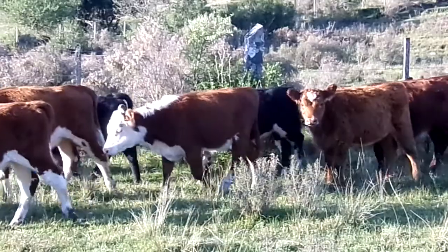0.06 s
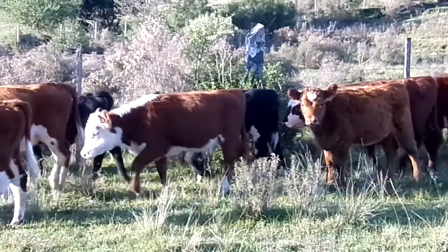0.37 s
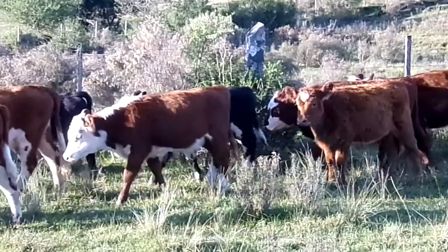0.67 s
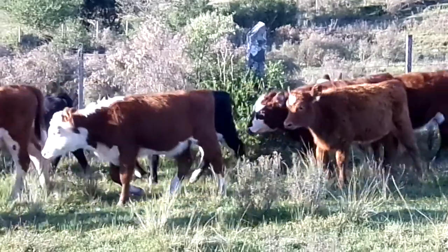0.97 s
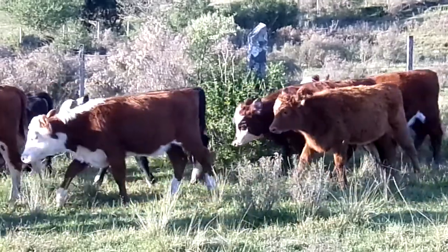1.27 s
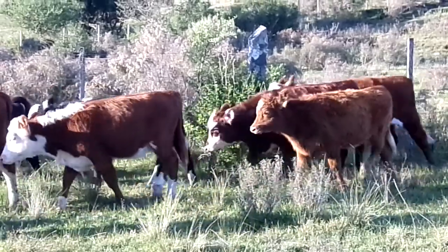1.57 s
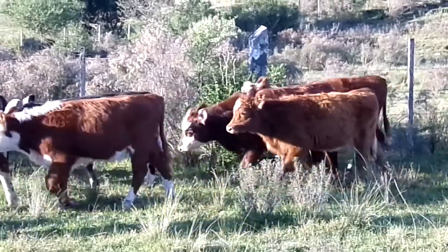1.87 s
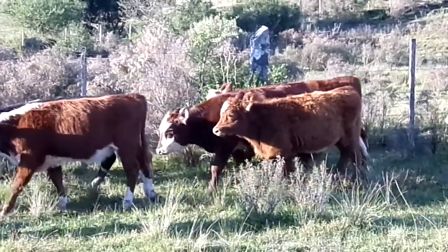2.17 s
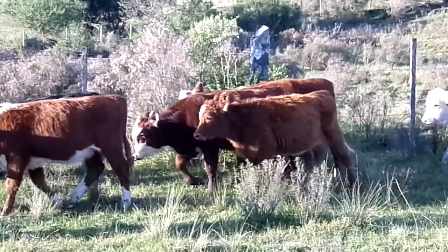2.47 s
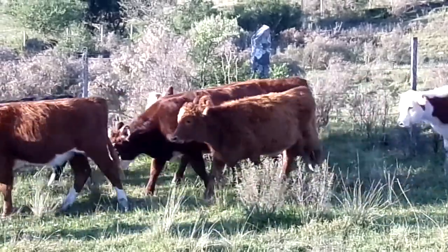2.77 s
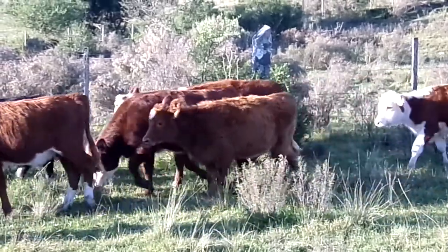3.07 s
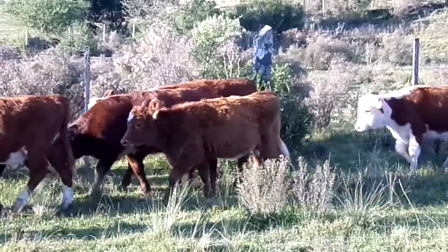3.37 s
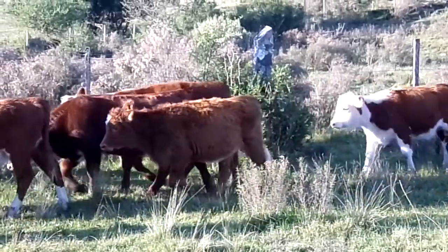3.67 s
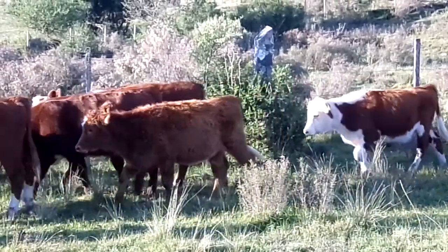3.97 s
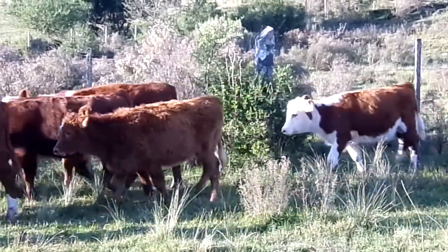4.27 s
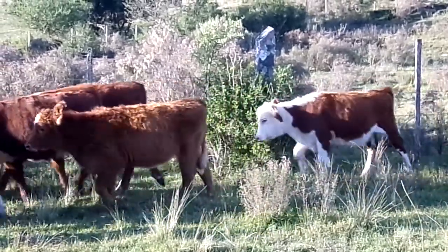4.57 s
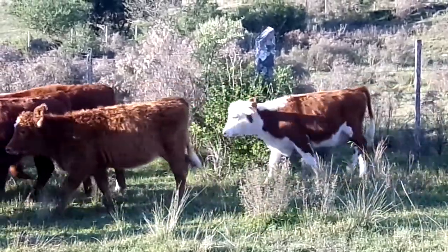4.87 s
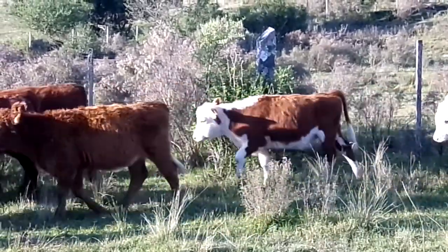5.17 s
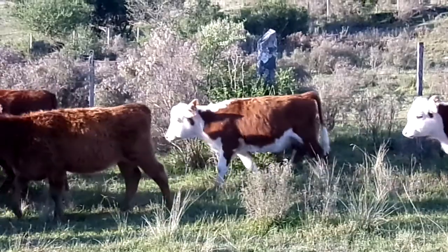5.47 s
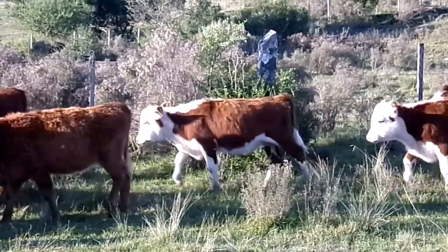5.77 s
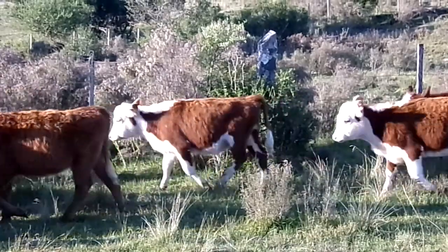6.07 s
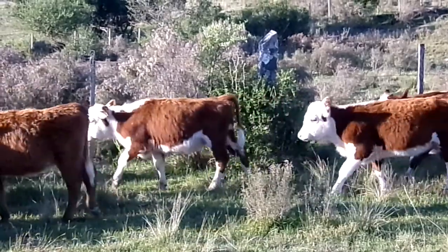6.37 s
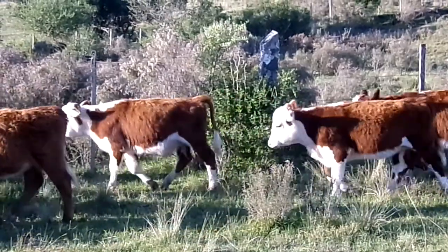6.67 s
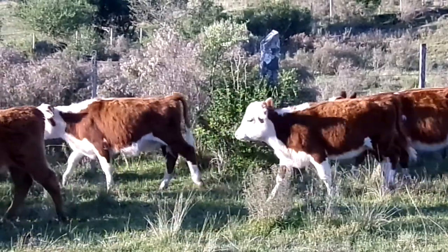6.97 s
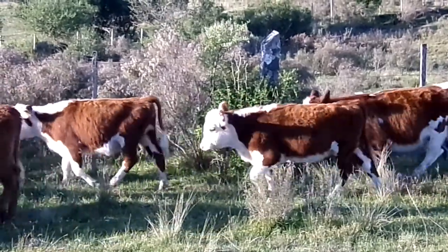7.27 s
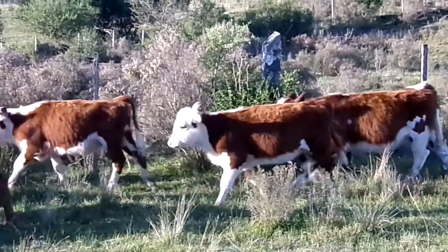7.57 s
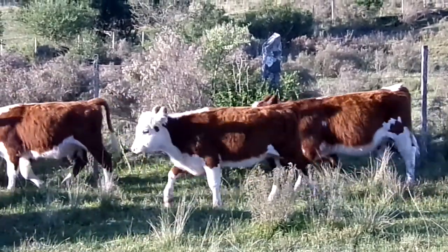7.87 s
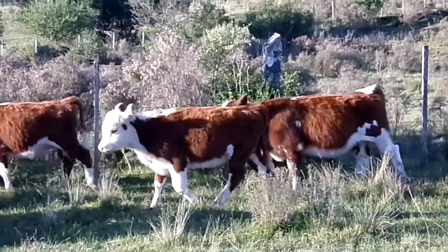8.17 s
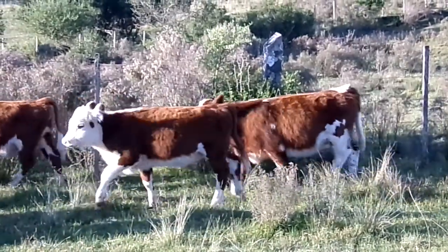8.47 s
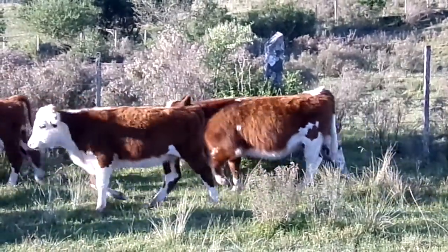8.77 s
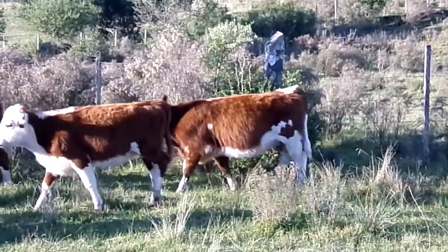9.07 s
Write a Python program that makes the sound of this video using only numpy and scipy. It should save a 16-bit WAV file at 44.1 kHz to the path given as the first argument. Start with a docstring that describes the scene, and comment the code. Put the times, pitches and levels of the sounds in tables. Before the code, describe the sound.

Young cattle moo in an open paddock. A clear, close moo fills the first second and turns rough as its pitch drops, while a distant moo runs from about 0.6 to 2 seconds. One hoarse animal repeats a short, breathy moo that scoops up and falls away, at about 0.6, 1.7, 2.9, 4.5, 5.8 and 7.4 seconds, with quieter low, fluttering rasps in between. A higher, cracking moo overlaps it around 4.6 to 5.2 seconds. A long moo runs from 6.6 to 8 seconds, together with a lower, slowly rising one that lasts until about 9.3. Another distant moo starts near 8.2 seconds, with a brief, far calf squeal. A small bird chips very faintly near 3.1, 5.2, 6.6 and 7.8 seconds. Legs softly brush grass a few times. A quiet field murmur and hiss continue throughout, and the calls have a faint, dull echo.

```python
"""Young cattle mooing in a paddock

A hoarse animal repeats a short moo and rasps in between, while others near and far call over it.
Each moo is a stream of pulses from the vocal folds, shaped by the throat, nose and mouth.
Legs swish through grass, a small bird chips, and a scrubby slope sends back a faint echo."""
import sys
import numpy as np
from scipy import signal
from scipy.fft import rfft, irfft, next_fast_len
from scipy.io import wavfile

SR = 44100
rng = np.random.default_rng(int(sys.argv[2]) if len(sys.argv) > 2 else 0)


def dump_mix(stems):
    """Bounce the given channels to the path in sys.argv[1] as a 16-bit WAV at rate SR."""
    frames = np.atleast_2d(stems).T  # one column per channel
    limited = np.clip(frames, -1, 1)  # hard clip at full scale
    pcm = np.round(limited * 32767).astype(np.int16)
    wavfile.write(sys.argv[1], SR, pcm)


N = 411009
TIME = np.arange(N) / SR

# The tone of the field, the hiss and the grass. Each row: frequency in Hz, boost or cut in dB.
FIELD_TONE = [(25, -42), (100, -11), (260, 4.5), (550, -10.5), (1200, -8.5), (2100, -8), (2750, -18.5),
              (3120, -5), (3600, -26.5)]
HISS_TONE = [(3600, -27.5), (4500, -19), (5000, -10), (7700, -5), (8500, -6.5), (9300, -17.5), (11000, -21),
             (15700, -23.5)]
GRASS_TONE = [(4300, -4.5), (5300, 2), (8000, 7.5), (9500, -6), (15000, -18)]
# Bird chips. Each row: start in seconds, first and last pitch in Hz, length in seconds, level in dB.
CHIPS = [(3.133, 6500, 4600, 0.036, -62), (5.193, 6400, 4700, 0.043, -62), (6.6, 6400, 4700, 0.037, -63),
         (7.764, 6840, 4700, 0.046, -60)]
# Legs brushing grass. Each row: middle and half length in seconds, level in dB.
SWISHES = [(1.283, 0.054, -69), (4.592, 0.17, -64.5), (5.908, 0.022, -59.5), (6.972, 0.12, -68.5)]
# Echoes off the slope. Each row: delay in seconds, level in dB.
ECHOES = [(0.048, -20), (0.112, -33)]

# Rasps between moos. Each row: start, peak and end in seconds, flaps per second, peak level in dB,
# uneven timing as a share of one flap.
RASPS = [(0.082, 0.424, 0.48, 130, -57, 0.1), (1.25, 1.518, 1.68, 79, -54, 0.075),
         (2.425, 2.663, 2.72, 94, -54.5, 0.072), (3.599, 3.8, 4.04, 85, -56.5, 0.058),
         (4.151, 4.221, 4.44, 86, -59, 0.058), (5.17, 5.5, 5.841, 84, -54, 0.039),
         (6.499, 6.662, 6.851, 99, -57.5, 0.046), (8.101, 8.663, 8.8, 116, -56, 0.095)]
# Single hard flaps in the rasps. Each row: time in seconds, strength in dB.
HARD_FLAPS = [(2.627, -22), (2.645, -18), (2.775, -18), (2.821, -23), (3.831, -20), (4.193, -17.5),
              (5.525, -16)]

# The course of single moos. Each row: time in seconds, pitch in Hz, mouth level in dB.
NEAR_MOO = [(-.03, 175.5, -32), (.2, 180.3, -35.5), (.42, 183.4, -34.5), (.58, 181.2, -33.5),
            (.68, 179.8, -33), (.78, 181.4, -38), (.91, 176.9, -34.5), (1.02, 165.6, -39),
            (1.075, 147.4, -43), (1.11, 133.3, -54)]
SHORT_MOO = [(4.38, 104.5, -79), (4.5, 127, -68), (4.6, 146.3, -62.5), (4.66, 170.4, -47.5),
             (4.72, 220.2, -46), (4.775, 242.5, -47.5), (4.795, 235.5, -44), (4.95, 231.5, -43),
             (5.05, 229.4, -43.5), (5.09, 220.7, -42), (5.12, 203.4, -43.5), (5.17, 158.7, -59)]
LONG_MOO = [(6.53, 126.9, -69), (6.62, 150.5, -57), (6.7, 175.2, -51.5), (6.76, 190.5, -50.5),
            (6.9, 208.5, -45.5), (7.0, 215, -42), (7.2, 221.1, -42), (7.35, 226.2, -45), (7.5, 226.8, -45),
            (7.85, 222.7, -43.5), (7.94, 217.4, -40.5), (7.98, 206.2, -44), (8.02, 178.2, -42.5),
            (8.06, 143, -50)]
RISING_MOO = [(6.28, 116, -63), (6.45, 124.5, -63.5), (6.9, 144.3, -54), (6.95, 148.7, -49),
              (7.02, 153.6, -40.5), (7.1, 147, -49), (7.175, 139, -53), (7.2, 139.5, -46),
              (7.3, 146, -45.5), (7.4, 149.5, -44), (7.8, 157, -45.5), (8.2, 165, -48.5), (8.7, 168, -48),
              (9.0, 163.5, -45.5), (9.12, 172.1, -48), (9.32, 174.4, -44.5)]
# Hoarse moos. Each row: start and end in seconds, pitch aimed for in Hz, nose and mouth levels in dB,
# darkness from 0 to 1.
HOARSE_MOOS = [(-.6, 0.088, 163, -43, -45, 0.6), (0.576, 1.224, 161.3, -43, -42, 0.1),
               (1.74, 2.356, 161.2, -43, -42, 0.23), (2.875, 3.562, 160, -43.5, -41, 0.22),
               (4.48, 5.211, 161.9, -40.5, -40.5, 0.08), (5.84, 6.463, 160, -43, -46, 1),
               (7.447, 8.193, 158.8, -42.5, -44.5, 0.87)]
# Far moos. Each row: start in seconds, pitch multiplier, nose and mouth levels in dB, whistle in dB.
FAR_MOOS = [(.56, 1.011, -50.5, -64.5, 12), (8.17, 1, -44, -57, 33.5)]
# A far moo climbs, breaks into full voice and sags. Each row: seconds in, pitch in Hz, change in dB.
FAR_SHAPE = [(0, 151.1, -14), (.3, 174, -16), (.4, 189, -16), (.51, 193, -6.5), (0.535, 189.7, -1),
             (.58, 186.5, 3), (0.66, 183, 1), (1.1, 178.6, -2), (1.28, 176.5, -6.5), (1.379, 157, -3)]
# A distant calf's squeal. Each row: start and end in seconds, first and last pitch in Hz, level in dB.
SQUEALS = [(8.275, 8.482, 468.4, 556, -50)]

# How throat and muzzle shape each voice. Each row: frequency in Hz, boost or cut in dB.
NEAR_THROAT = [(180, -21.5), (360, -7.5), (540, -27), (720, -3.5), (900, -16.5), (1080, -13), (1270, 0.5),
               (1450, -15), (1640, -12), (1820, -24.5), (2300, -22.5), (2750, -33.5), (3450, -45),
               (3750, -49), (9000, -53.5)]
SHORT_THROAT = [(150, -38), (235, 6), (460, -16), (700, -17), (920, -3), (1170, -1.5), (1400, -10),
                (1630, 1), (1870, -10), (2100, -7.5), (2400, -26), (2750, -29), (3000, -26), (3250, -16.5),
                (3700, -54), (5200, -31), (9000, -51)]
LONG_THROAT = [(150, -26.5), (225, 1.5), (450, -24), (680, -23), (890, -1), (1130, -16.5), (1360, -6),
               (1600, -17), (2200, -23.5), (3200, -17), (3600, -57), (5200, -35), (9000, -45.5)]
RISING_THROAT = [(160.0, -10.5), (330.0, 8), (490.0, -27), (670.0, -26), (830.0, -17.5), (1000.0, -23),
                 (1350.0, -13), (1650.0, -14.5), (2100.0, -23.5), (3200.0, -26.5), (3700.0, -42.5),
                 (9000.0, -46.5)]
HOARSE_THROAT = [(110, -30), (155, -13.5), (240, 3), (320, -6), (470, -17.5), (750, -24.5), (930, -16),
                 (1100, -23), (1350, -8.5), (1650, -19.5), (2400, -29), (3500, -50), (5500, -41.5),
                 (9000, -45.5)]
FAR_THROAT = [(185, -3), (370, -8.5), (550, -22), (740, -14.5), (920, 0.5), (1100, -5.5), (1300, 5.5),
              (1480, -13), (2020, -3), (2400, -16), (2650, -1.5), (2950, -27), (3200, -6), (3600, -56),
              (5200, -17), (9000, -73)]
SQUEAL_THROAT = [(500, -21), (1000, -5), (1130, -10), (1450, -4), (1620, -1.5), (2100, -19), (3000, -50)]
RASP_THROAT = [(65, -52), (110, -24), (134, -18.5), (204, 7.5), (320, 2), (476, -10), (590, -17.5),
               (732, -42), (869, 2.5), (1050, -10.5), (1400, 0), (1860, -5), (2410, -28), (2860, -60.5),
               (3070, -41), (3400, -53), (4420, -75), (7480, -120)]
# Narrow bands where a call rings or dips. Each row: centre and half width in Hz, boost or cut in dB.
NEAR_RINGS = [(2007, 110, 9.5), (3190, 150, 21.5), (4370, 93, 0), (5950, 310, 17.5)]
SHORT_RINGS = [(3950, 110, 26)]
LONG_RINGS = [(2590, 150, 3.5), (2930, 112, -28)]
HOARSE_RINGS = [(1920, 90, 11.2), (2198, 117, 11.5), (2612, 168, 17.3)]
DARK_RINGS = [(453, 20, 10), (1370, 140, -3), (2590, 310, -7.5)]
HARD_FLAP_RINGS = [(2550, 420, 9.7)]
# Where a voice cracks. Each row: middle and half length in seconds, added roughness from 0 to 1.
NEAR_CRACKS = [(1.06, 0.028, 0.25)]
SHORT_CRACKS = [(4.68, 0.04, 0.5), (4.762, 0.022, 0.9), (5.135, 0.022, 0.4)]
LONG_CRACKS = [(7.6, .33, .05), (8.005, 0.023, 0.6)]
# Gliding bands; those below 3000 Hz are vowels made by jaw and tongue. Each row: width in Hz, then
# a path. Each point on the path: time in seconds, centre in Hz, boost or cut in dB.
SHORT_GLIDES = [(180, [(4.65, 1240, 2.9), (4.82, 1400, 9.5), (4.9, 1829, 4), (5.0, 1190, 6.4),
                (5.12, 1301, 1)])]
RISING_GLIDES = [(160, [(6.9, 1327, -2), (7.02, 1440, 5), (7.2, 1676, 11), (7.35, 1710, 6),
                 (7.48, 1780, 11), (7.6, 1790, 1), (8.2, 1640, 8.5), (8.7, 1660, 1)]),
                 (450, [(6.28, 3120, 17), (6.5, 3140, 14), (6.75, 3070, 11), (6.95, 3050, -3)])]
# In these two, the last row is a thin ring near 3200 Hz that flares and fades during the moo.
NEAR_GLIDES = [(160, [(0, 1400, -9), (.13, 1640, 5), (.25, 1450, -3), (.42, 1490, 9), (.56, 1490, 8),
               (.68, 1270, 1.5), (.8, 1270, 9), (1.0, 1210, 1.5)]), (160, [(.12, 2650, 7), (.25, 2380, 0.5),
               (.64, 2250, 8.5), (.92, 2764, 4.5)]), (220, [(0, 3280, 7.5), (.07, 3220, 1.5),
               (.31, 3100, 5), (.68, 3280, -0.5), (.9, 3240, -3.5), (1.0, 3170, 3.5)])]
LONG_GLIDES = [(140, [(6.75, 1680, 10), (7.0, 2000, 1), (7.32, 1550, 7.7), (7.8, 1579, 2.02)]),
               (180, [(6.9, 1250, 5), (7.1, 1260, -6), (7.45, 1151, 9.5), (7.85, 1190, 5)]),
               (220, [(7.0, 3130, 3.5), (7.53, 3205, -2.5), (7.6, 3160, 10), (7.74, 3176, -5),
               (7.95, 3250, 5)])]
# Gliding bands for repeated moos, with time counted from the start of the moo.
HOARSE_GLIDES = [(170, [(0, 945, -4), (.23, 1116, 12.5), (.38, 1300, 6), (.54, 1380, 2), (.66, 1290, 4)]),
                 (200, [(0, 1460, 15), (.26, 1700, 9.5), (.46, 1830, 2), (.66, 1810, 5.5)]),
                 (500, [(0, 2200, -2), (.3, 2430, 3), (.55, 2660, -3.5), (.66, 2700, -3.5)])]
FAR_GLIDES = [(120, [(0, 1450, 0), (.55, 1490, -5), (.7, 1660, 7), (1.3, 1610, 14.5)]), (120, [(0, 1080, 3),
              (.54, 940, 2.8), (.8, 920, 3), (1.3, 1080, 1.3333)]), (400, [(0, 1900, -11), (.3, 2070, -8),
              (.5, 1700, 0), (.7, 1410, 0.5), (1.3, 1350, -2.5)])]
# One more such path, a vowel sweeping upward. The darker a hoarse moo, the stronger it is.
DARK_VOWEL_WIDTH_HZ, DARK_VOWEL = 84, [(.1, 970, 6.2), (.2, 1160, 12), (.29, 1430, 7.3),
                                       (.37, 1600, 6.8), (.44, 1890, 9.6), (.62, 1980, 2.4)]
# Bands in which the voices waver. Each row: centre in Hz, typical swing in dB.
WAVERING_BANDS = [(1500, 1.2), (1800, 1.8), (2150, 2), (2500, 2.2), (2850, 2.5), (3220, 3)]


def from_db(db):
    """Turn decibels into a multiplier."""
    return 10 ** (np.asarray(db) / 20)


def rms_one(x):
    """Scale a sound to an average (RMS) level of 1."""
    return x / np.sqrt(np.mean(x ** 2) + 1e-20)


def drift(size, per_second):
    """A random line that wanders around zero by about 1."""
    points = rng.standard_normal(int(size / SR * per_second) + 3)
    return np.interp(np.arange(size) / SR * per_second, np.arange(len(points)), points)


def swell(t, centre, half_width):
    """A smooth bump of height 1."""
    return np.exp(-((t - centre) / half_width) ** 2)


def span(start, end):
    """The sample numbers of a call, and a quick fade at both ends."""
    at = np.flatnonzero((TIME >= start) & (TIME <= end))
    return at, np.clip(np.minimum(TIME[at] - start, end - TIME[at]) / .015, 0, 1)


def above(x, hz):
    """Keep the highs, fading them in over the octave above hz."""
    size = 2 * next_fast_len(len(x))
    share = np.clip(np.log2(np.maximum(np.fft.rfftfreq(size, 1 / SR), 1) / hz), 0, 1)
    return irfft(rfft(x, size) * share)[:len(x)]


def colour(x, tone, rings=()):
    """Filter a sound by a tone table and narrow rings, losing 24 dB an octave past the table's ends."""
    size = 2 * next_fast_len(len(x) // 2 + 2048)
    octave = np.log2(np.maximum(np.fft.rfftfreq(size, 1 / SR), 10))
    hz, db = np.transpose(tone)
    outside = np.maximum(np.log2(hz[0]) - octave, 0) + np.maximum(octave - np.log2(hz[-1]), 0)
    peaks = sum(height * swell(2 ** octave, centre, half) for centre, half, height in rings)
    gain = from_db(np.interp(octave, np.log2(hz), db) + peaks - 24 * outside)
    # make the filter ring after each pulse, never before it (minimum phase)
    cepstrum = irfft(np.log(gain))
    cepstrum[1:size // 2] *= 2
    cepstrum[size // 2 + 1:] = 0
    return irfft(rfft(x, size) * np.exp(rfft(cepstrum)))[:len(x)]


def background(field_db=-64, hiss_db=-67, flutter_db=1.5, grain_db=1.5):
    """The open field murmurs low under a fine, slightly restless hiss."""
    field = from_db(field_db) * rms_one(colour(rng.standard_normal(N), FIELD_TONE))
    restless = from_db(flutter_db * drift(N, 14) + grain_db * drift(N, 400))
    return field + from_db(hiss_db) * rms_one(colour(rng.standard_normal(N) * restless, HISS_TONE))


def bird():
    """Each chip is a thin tone sliding down."""
    out = np.zeros(N)
    for start, first_hz, last_hz, length, db in CHIPS:
        size, at = int(length * SR), int(start * SR)
        cycles = np.cumsum(np.linspace(first_hz, last_hz, size)) / SR
        out[at:at + size] += from_db(db) * np.hanning(size) * np.sin(2 * np.pi * cycles)
    return out


def grass(grain_db=3.0):
    """Dry stalks brush past legs in grainy swells."""
    strokes = sum(from_db(db) * swell(TIME, middle, half) for middle, half, db in SWISHES)
    grains = rng.standard_normal(N) * from_db(grain_db * drift(N, 300))
    return strokes * rms_one(colour(grains, GRASS_TONE))


def slope_echo(x, scatter_db=-23, fade_s=0.23, dull_hz=2200):
    """The slope returns dull echoes, and its bushes add a thin scatter."""
    scatter = rng.standard_normal(SR) * from_db(-60 * TIME[:SR] / fade_s)
    response = from_db(scatter_db) * rms_one(scatter) / np.sqrt(SR)
    for delay, db in ECHOES:
        response[int(delay * SR)] += from_db(db)
    echoes = signal.fftconvolve(x, response)[:N]
    return signal.sosfilt(signal.butter(1, dull_hz, fs=SR, output="sos"), echoes)


def through_grass(x, hz=1200, width_hz=600):
    """The way through the grass spreads each pulse over about a millisecond, keeping its tone."""
    decay = np.exp(-np.pi * width_hz / SR)
    poles = [1, -2 * decay * np.cos(2 * np.pi * hz / SR), decay * decay]
    return signal.lfilter(poles[::-1], poles, x)


def wavering(x, width_hz=350, per_second=22):
    """The upper overtones swell and sink, each band on its own."""
    for hz, depth_db in WAVERING_BANDS:
        band = signal.lfilter(*signal.iirpeak(hz, hz / width_hz, fs=SR), x)
        x = x + band * (from_db(depth_db * drift(N, per_second)) - 1)
    return x


def fold_pulses(cycles, jitter, shimmer_db):
    """The vocal folds click as they close, uneven in timing (jitter) and strength (shimmer)."""
    beats = np.arange(int(cycles[-1])) + .5
    late, loud = rng.standard_normal((2048, 2))[:len(beats)].T
    jitter = np.interp(beats, cycles, jitter * np.ones(len(cycles)))
    shimmer_db = np.interp(beats, cycles, shimmer_db * np.ones(len(cycles)))
    where = np.interp(beats + jitter * late, cycles, np.arange(len(cycles)))
    strength = from_db(shimmer_db * np.clip(loud, -2, 1))
    # share each click between the two nearest samples
    out = np.zeros(len(cycles) + 1)
    np.add.at(out, where.astype(int), strength * (1 - where % 1))
    np.add.at(out, where.astype(int) + 1, strength * (where % 1))
    return out[:-1]


def rasps(swell_db=9, fade_db=14.5, slowing=.35, puff_s=.004, air=.07):
    """Slack folds flap and let puffs through. A rasp swells, then fades and slows as air runs out."""
    out = np.zeros(N)
    for start, peak, end, flaps_per_s, peak_db, jitter in RASPS:
        at, gate = span(start, end)
        starting = np.maximum((peak - TIME[at]) / (peak - start), 0)
        ending = np.maximum((TIME[at] - peak) / (end - peak), 0)
        rate = flaps_per_s * (1 - slowing * ending)
        db = peak_db - swell_db * starting ** 1.3 - fade_db * ending ** 1.46
        flaps = fold_pulses(np.cumsum(rate) / SR, jitter, shimmer_db=1.5) / np.sqrt(rate)
        puffs = signal.lfilter([1], [1, -np.exp(-1 / (puff_s * SR))], flaps)
        puffs *= rng.standard_normal(len(at))
        out[at] += gate * from_db(db) * rms_one(colour(flaps + air * puffs, RASP_THROAT))
    hard_flaps = np.zeros(N)
    for s, db in HARD_FLAPS:
        hard_flaps[int(s * SR)] = from_db(db)
    return out + colour(hard_flaps, RASP_THROAT, HARD_FLAP_RINGS)


def glide(x, t, width_hz, path):
    """Boost or cut one band of a sound, its centre and strength following a path."""
    s, hz, db = np.transpose(path)
    spin = np.exp(2j * np.pi * np.cumsum(np.interp(t, s, hz)) / SR)
    decay = np.exp(-np.pi * width_hz / SR)
    # shift the band down to 0 Hz, smooth away the rest, shift it back
    band = 2 * np.real(spin * signal.lfilter([(1 - decay) / 2] * 2, [1, -decay], x / spin))
    return x + (from_db(np.interp(t, s, db)) - 1) * band


def follow(rows):
    """A call that follows a table. Gives its samples, fade, pitch and mouth level."""
    s, hz, db = np.transpose(rows)
    at, gate = span(s[0], s[-1])
    return at, gate, np.interp(TIME[at], s, hz), np.interp(TIME[at], s, db)


def arch(start, end, aim_hz, mouth_db, scoop_s=.205, collapse_s=.033):
    """A call that scoops up in pitch as the mouth opens, holds, then collapses."""
    at, gate = span(start, end)
    scoop = 1 - .335 * np.exp(-((TIME[at] - start) / scoop_s) ** 1.2)
    collapse = 1 - .31 * np.exp((TIME[at] - end) / collapse_s)
    opening_db = 71 * np.log2(scoop) + 40.5 * np.log2(collapse)
    return at, gate, aim_hz * scoop * collapse, mouth_db + opening_db - opening_db.max()


def moo(call, throat, nose_db, nose_follows, rough, slack, air,
        rings=(), cracks=(), glides=(), glides_from=0, lift=0.049, waver=0.001536):
    """Fold pulses ring in the throat. The nose lets out the lows, the opening mouth the rest."""
    at, gate, pitch, mouth_db = call
    hum_db = nose_db + nose_follows * (mouth_db - mouth_db.max())
    effort = pitch / pitch.max()
    # the folds beat unevenly when the pitch sags and where the voice cracks
    cracking = sum(more * swell(TIME[at], middle, half) for middle, half, more in cracks)
    rough = rough + slack * (1 - effort) + cracking
    cycles = np.cumsum(pitch * (1 + waver * drift(len(at), 35.53))) / SR
    folds = fold_pulses(cycles, jitter=0.099 * rough, shimmer_db=5 * rough) * SR / pitch / 2
    # air escapes once a cycle and hisses most in the treble
    puffs = rng.standard_normal(len(at)) * np.sin(np.pi * cycles) ** 2 * np.sqrt(SR / pitch)
    puffs = signal.sosfilt(signal.butter(1, 1800, "high", fs=SR, output="sos"), puffs)
    voice = colour(folds + (air + .4 * rough) * puffs, throat, rings)
    for width_hz, path in glides:
        voice = glide(voice, TIME[at] - glides_from, width_hz, path)
    bright = above(voice, 400)
    # tense folds snap shut harder, so the brassy top grows with effort
    brass = above(voice, 2300) * (effort ** (np.log(1000) * lift) - 1)
    out = np.zeros(N)
    out[at] = gate * ((voice - bright) * from_db(hum_db) + (bright + brass) * from_db(mouth_db))
    return out


def far_cattle(ring=(2030, 155, 6.5), whistle_hz=3940):
    """Far moos carry a whistling overtone."""
    out = np.zeros(N)
    for start, ratio, nose_db, mouth_db, whistle_db in FAR_MOOS:
        call = follow([(start + s, ratio * hz, mouth_db + db) for s, hz, db in FAR_SHAPE])
        out += moo(call, FAR_THROAT, nose_db, nose_follows=.85, rough=.012, slack=.02, air=.08,
                   rings=[ring, (whistle_hz, 150, whistle_db)], glides=FAR_GLIDES, glides_from=start)
    return out


def squealing_calf():
    """A distant calf squeals, high and rising, loudest in the middle."""
    out = np.zeros(N)
    along = np.linspace(0, 1, 12)
    for start, end, first_hz, last_hz, db in SQUEALS:
        pitch = last_hz - (last_hz - first_hz) * (1 - along) ** 1.7
        mouth_db = db - 9 * (2 * along - 1) ** 2
        call = follow(np.transpose([start + (end - start) * along, pitch, mouth_db]))
        out += moo(call, SQUEAL_THROAT, nose_db=db, nose_follows=1, rough=.02, slack=.1, air=.05)
    return out


def other_callers():
    """A short and a long moo crack as they go, and a lower one slowly rises."""
    short = moo(follow(SHORT_MOO), SHORT_THROAT, nose_db=-39.5, nose_follows=.91, rough=.022,
                slack=.05, air=.13, rings=SHORT_RINGS, cracks=SHORT_CRACKS, glides=SHORT_GLIDES)
    long = moo(follow(LONG_MOO), LONG_THROAT, nose_db=-36, nose_follows=.8, rough=.008,
               slack=.03, air=.06, rings=LONG_RINGS, cracks=LONG_CRACKS, glides=LONG_GLIDES)
    rising = moo(follow(RISING_MOO), RISING_THROAT, nose_db=-50.5, nose_follows=.68, rough=.02,
                 slack=.03, air=.09, glides=RISING_GLIDES)
    return short + long + rising


def near_calf():
    """One clear, close moo turns rough as its pitch drops."""
    return moo(follow(NEAR_MOO), NEAR_THROAT, nose_db=-36.5, nose_follows=.15, rough=.005,
               slack=.24, air=.03, rings=NEAR_RINGS, cracks=NEAR_CRACKS, glides=NEAR_GLIDES)


def hoarse_animal():
    """One breathy moo comes again and again, sometimes darker in tone."""
    out = np.zeros(N)
    for start, end, aim_hz, nose_db, mouth_db, dark in HOARSE_MOOS:
        rings = HOARSE_RINGS + [(hz, half, dark * db) for hz, half, db in DARK_RINGS]
        dark_path = [(s, hz, dark * db) for s, hz, db in DARK_VOWEL]
        glides = HOARSE_GLIDES + [(DARK_VOWEL_WIDTH_HZ, dark_path)]
        out += moo(arch(start, end, aim_hz, mouth_db), HOARSE_THROAT, nose_db, nose_follows=.33,
                   rough=.022, slack=.1, air=.16, rings=rings, glides=glides, glides_from=start, lift=.25)
    return out


def scene():
    """Mix the cattle, their echo and the paddock into one channel."""
    moos = near_calf() + hoarse_animal() + other_callers() + far_cattle() + squealing_calf()
    cattle = through_grass(wavering(moos) + rasps())
    return (cattle + slope_echo(cattle) + grass() + bird() + background())[None]


def record(dry, cutoff_hz=15600):
    """Cut off the very highest treble."""
    return signal.sosfilt(signal.ellip(10, .1, 80, cutoff_hz, fs=SR, output="sos"), dry)


dry = scene()
out = record(dry)
dump_mix(out)
```